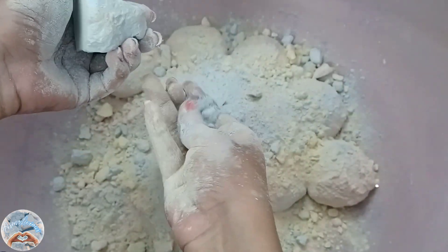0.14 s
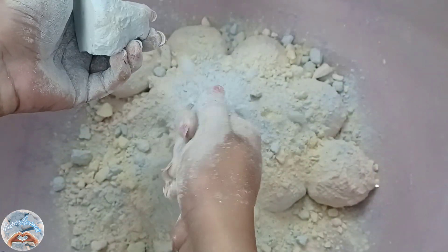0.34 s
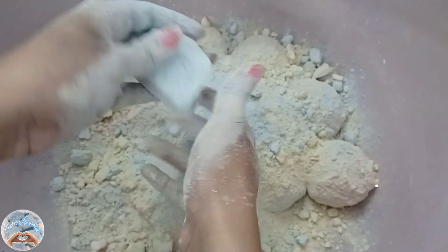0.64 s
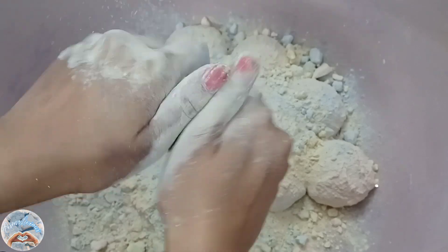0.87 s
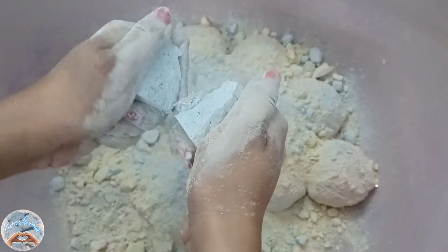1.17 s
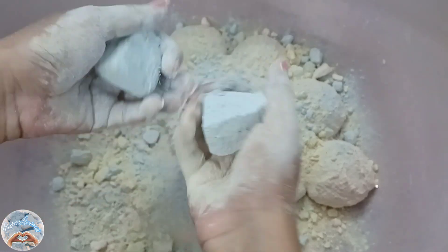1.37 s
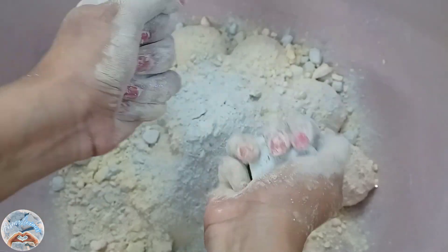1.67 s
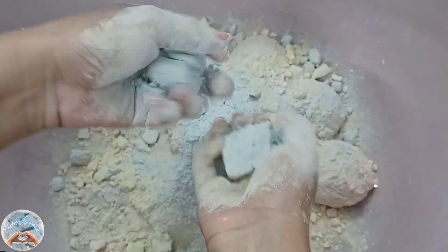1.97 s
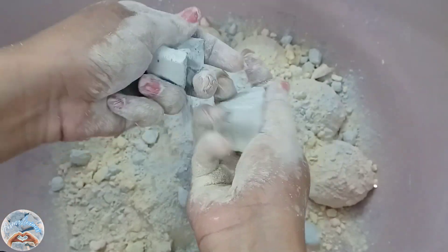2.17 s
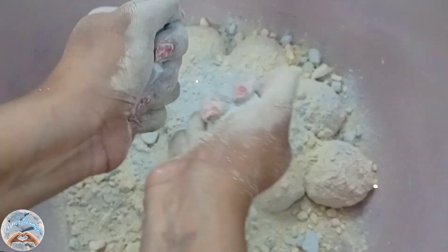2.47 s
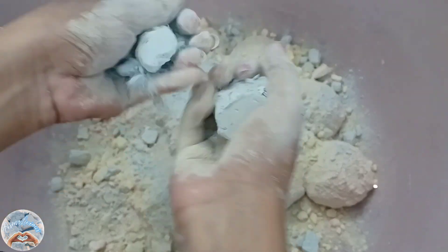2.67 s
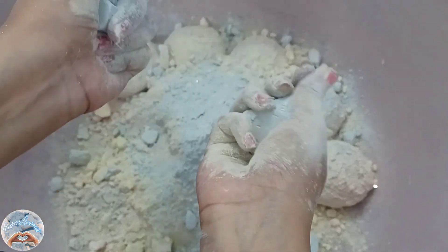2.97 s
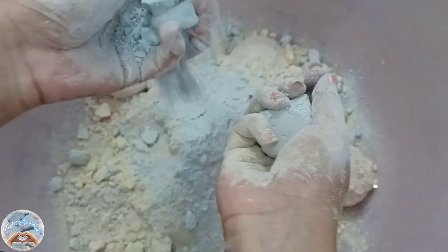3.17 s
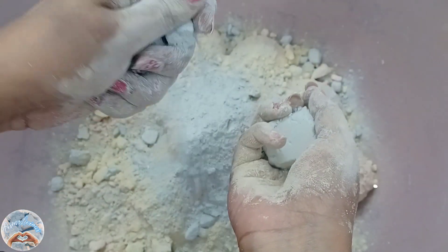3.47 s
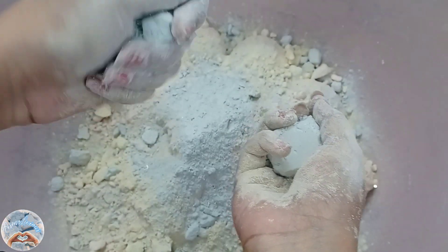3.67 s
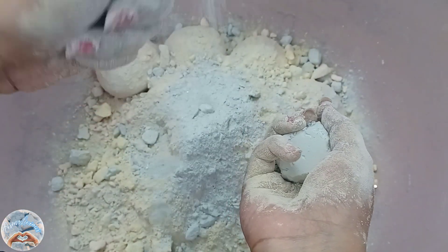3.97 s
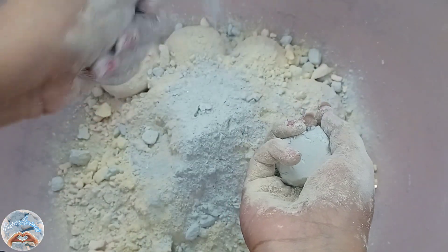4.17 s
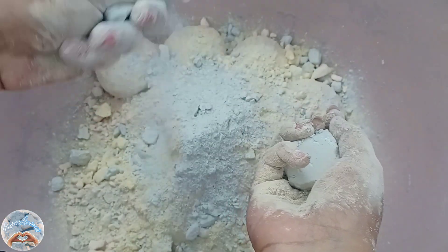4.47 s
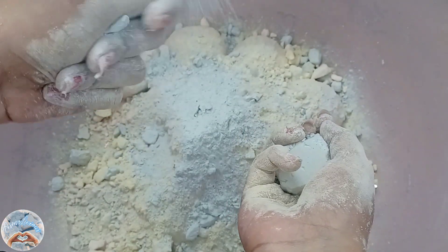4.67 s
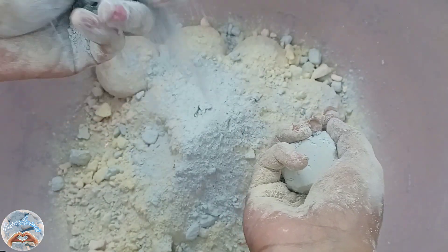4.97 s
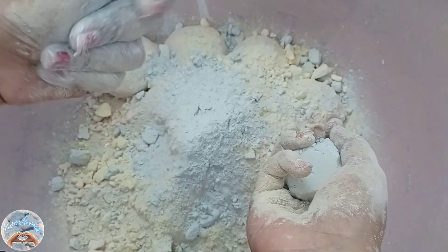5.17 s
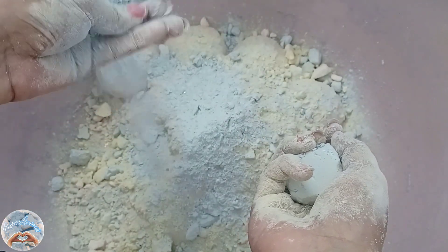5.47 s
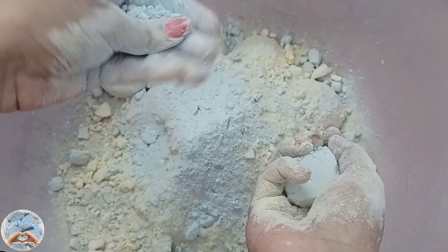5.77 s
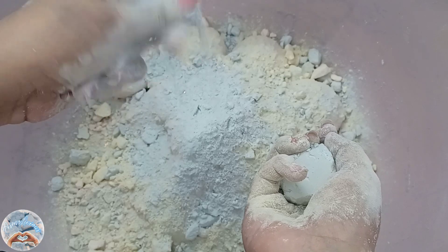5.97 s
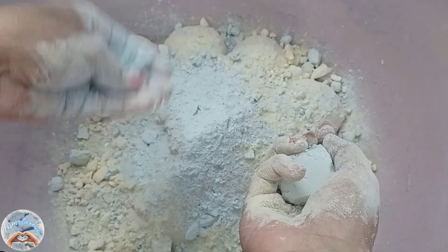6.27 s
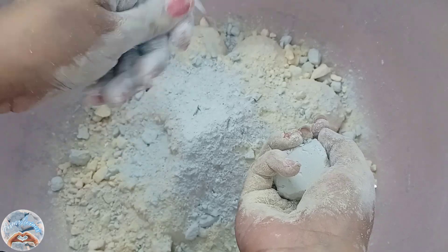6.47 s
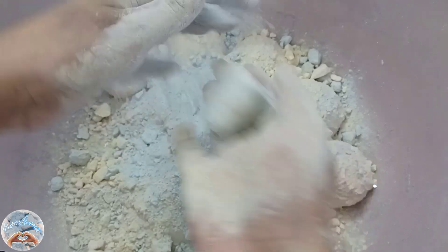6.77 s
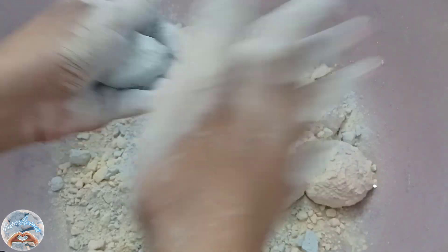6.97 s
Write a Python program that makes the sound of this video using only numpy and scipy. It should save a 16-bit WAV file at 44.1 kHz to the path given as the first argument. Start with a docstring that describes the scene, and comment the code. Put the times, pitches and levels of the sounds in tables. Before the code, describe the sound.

A low, slightly wavering fan hum and soft bassy air run throughout, in a small room close to the microphone. At once, at 0.05 s, a very bright, hard chalk crack; at 0.5 s another loud snap with a hollow plastic basin knock. Around 1.1 s lumps press together in a heavy crunch with dull thuds and a tiny high squeak. A duller break and thud land at 1.7 s. From 2.0 to 2.3 s knocks, crunches and dry clacks cluster, and at 2.55 s comes the densest burst of gritty snaps. Smaller breaks follow near 2.9 and 3.3 s. From 3.4 to 4.9 s crumbs crackle and grind muffled in a fist, with fine powder fizzing and trickling and a crisp tick at 4.2 s. It quiets around 5 s, then crunches and two sharp snaps come at 5.45-5.5 s. Soft powdery rubbing remains, with a small crunch at 6.8 s and a faint knock near 7 s.

```python
"""Lumps of dry chalk snap and crumble between two hands over a plastic basin, close to a phone microphone.
Each break is an avalanche of clicks, coloured into a clack and grit, with the basin's modes knocked along.
Swelling grains make powder rubbing and trickling, crumbs in the fist and the palm's rumble; lumps squeak
together once by stick-slip, and pieces thud onto the heap. Behind them a wavering sine and soft noise
stand for the motor and air of a fan, and the small room answers with dense reflections."""
import sys
import numpy as np
from scipy import signal
from scipy.fft import rfft, irfft
from scipy.io import wavfile
from scipy.ndimage import uniform_filter1d

SR = 44100
rng = np.random.default_rng(int(sys.argv[2]) if len(sys.argv) > 2 else 0)


def store_wav(level_fs):
    """Save 16-bit WAV to argv[1]."""
    pcm = np.round(np.clip(np.atleast_2d(level_fs), -1, 1) * 32767)
    wavfile.write(sys.argv[1], SR, pcm.T.astype(np.int16))


N = 313992
TIME = np.arange(N) / SR
SHORT = TIME[:4096]  # time axis of one blow
BLOW_S = .005  # a blow's dB is its energy spread over this many seconds

# The bright spray of chalk grit. Each row: frequency in Hz, relative spectrum level in dB.
GRIT_SPECTRUM = [(1500, -42), (3500, -16), (5500, -2), (7500, 1), (10000, -1.5), (13000, -6), (16000, -16)]


def gain_of(db):
    """Decibels to amplitude."""
    return 10 ** (np.asarray(db) / 20)


def evened(x):
    """Scales to rms 1."""
    return x / np.sqrt(np.mean(x ** 2) + 1e-20)


def blow(x, db):
    """Gives a short sound the energy of a blow of this level."""
    return gain_of(db) * x * np.sqrt(BLOW_S * SR / (np.sum(x ** 2) + 1e-20))


def read(points, hz):
    """Reads a table of values against frequency on a log-frequency axis."""
    f, value = np.transpose(points)
    return np.interp(np.log(hz + 1), np.log(f + 1), value)


def add(mix, s, sound):
    """Mixes a sound in at s seconds."""
    part = mix[max(round(s * SR), 0):][:len(sound)]
    part += sound[:len(part)]


def colour(x, points):
    """Causal minimum-phase filter with the given spectrum, so attacks stay sharp."""
    hz = abs(np.fft.fftfreq(len(SHORT), 1 / SR))
    log_gain = np.log(gain_of(read(points, hz)))
    taps = np.fft.ifft(np.exp(np.conj(signal.hilbert(log_gain)))).real
    return signal.oaconvolve(x, taps)[:len(x)]


def drift(rate_hz):
    """Slow random wandering of rms 1, smoothed above the given rate."""
    hz = np.fft.rfftfreq(N, 1 / SR)
    return evened(irfft(rfft(rng.standard_normal(N)) / (1 + (hz / rate_hz) ** 4), N))


def grains(per_s, spread_db):
    """Sparse clicks of either sign at random moments: many small, a few large."""
    size = gain_of(spread_db * np.minimum(rng.exponential(1, N), 4.5))
    return size * rng.choice([-1, 1], N) * (rng.random(N) < per_s / SR)


def swells(pushes, rest_db):
    """Each push of the hand rises and falls as a bell; their powers add over a resting level."""
    power = sum(gain_of(db) ** 2 * np.exp(-((TIME - s) / half) ** 2) for s, half, db in pushes)
    return np.sqrt(gain_of(rest_db) ** 2 + power)


def ringing(modes, detune):
    """Dying modes; each contact point detunes and weights them a little differently."""
    hz, db, t60 = np.transpose(modes)[:, :, None]
    shift, weight = rng.standard_normal((2, len(modes), 1))
    envelope = gain_of(db + 2 * weight - 60 * SHORT / t60)
    return (envelope * np.sin(2 * np.pi * hz * (1 + detune * shift) * SHORT)).sum(0)


def fracture(decay, per_s):
    """A crack runs through the chalk: a first click and a dying avalanche of random ones."""
    build_up_s = .0002  # the avalanche takes a moment to gather speed
    clicks = rng.standard_normal(len(SHORT)) * (rng.random(len(SHORT)) < per_s / SR)
    clicks *= 1 - np.exp(-SHORT / build_up_s)
    clicks[0] = 0.67
    return clicks * np.exp(-SHORT / max(decay, 1 / SR))


def unpitched(clicks):
    """Levels an avalanche's broad spectral humps, so that the lump gives the colour."""
    power = uniform_filter1d(abs(rfft(clicks)) ** 2, size=40)
    excess_db = 10 * np.log10(power / power.mean() + 0.048)
    return colour(clicks, np.column_stack([np.fft.rfftfreq(len(clicks), 1 / SR), -excess_db]))


def knock(db):
    """A soft contact rings the basin's low modes; it takes a moment to build up."""
    # The basin's low modes. Each row: frequency in Hz, relative level in dB, t60 in seconds.
    basin_modes = [(234, -10, 0.095), (309.5, -7.5, 0.055), (364.8, 1.5, 0.051), (412, -10, 0.033),
                   (483, -7.5, 0.026), (625, -14, 0.016), (687.5, -7, 0.043)]
    return blow(ringing(basin_modes, detune=0.036) * (1 - np.exp(-SHORT / 0.0012)), db)


def crack(decay, clack_db, hz, width, grit_db, knock_db, ring_share, low_db, high_db):
    """One fracture: the lump clacks around its own pitch, grit sprays, and the basin is knocked."""
    # The brighter ring of chalk and basin. Each row: frequency in Hz, relative level in dB, t60 in seconds.
    ring_modes = [(745, 5, 0.027), (830, -10.5, 0.018), (1144, 2.5, 0.032), (1520, -15, .018),
                  (1700, -16, .014), (1933, 5.5, 0.022), (2263, 1.5, 0.019), (2643, 3, 0.015),
                  (2920, -4, 0.014), (3395, -5.5, 0.044), (3950, -4.5, 0.0054), (5920, 3.5, 0.018),
                  (7440, 10, 0.0089)]
    clicks = unpitched(fracture(decay, per_s=9800))
    # soft chalk blunts every click
    clicks = signal.sosfilt(signal.butter(2, 9000, fs=SR, output="sos"), clicks)
    rung = signal.fftconvolve(clicks, ringing(ring_modes, detune=0.0094))[:len(SHORT)]
    # each skirt point: distance from hz in widths, level in dB
    skirts = [(-2.0, -36.0), (-1, low_db), (-0.56, 1.5), (0.81, -1.0), (1, high_db), (2.5, -33.5)]
    shape = [(hz * 2 ** (step * width), db) for step, db in skirts]
    clack = evened(colour(clicks, shape)) + ring_share * evened(colour(rung, shape))
    grit = colour(fracture(decay, per_s=7000), GRIT_SPECTRUM)
    return blow(clack, clack_db) + blow(grit, grit_db) + knock(knock_db)


def snaps(ring_share):
    """Big lumps break or knock on one another with a short, dry clack."""
    # Each row: start in seconds, decay in seconds, clack level in dB, clack centre in Hz,
    # clack width in octaves, grit level in dB, basin knock level in dB.
    breaks = [(0.0488, .0015, -8.5, 6150, 1, -49.5, -47), (0.0498, 0.0028, -16.5, 2410, 0.91, -53, -38),
              (0.5133, 0.0011, -10, 2200, 0.92, -30, -19.5), (.545, 0.00089, -22, 686, 0.79, -51, -25),
              (0.5504, 0.00093, -19.5, 1600, 0.79, -46, -31), (1.109, 0.013, -23, 870, 1, -24.5, -17.5),
              (1.118, .006, -23, 900, 0.91, -36, -18), (1.146, .0018, -24, 1370, 1.86, -33, -11),
              (1.679, 0.0035, -27.5, 1780, 1.3, -33, -26), (2.179, 0.0038, -24.5, 1670, 1.2, -32, -15.5),
              (2.185, 0.0012, -16.5, 2300, 1.3, -34.5, -18), (2.2491, 0.0027, -14, 2240, 1.0, -38, -28),
              (2.5456, .0013, -26, 1440, 1.1, -32, -43.5), (2.55, 0.0042, -10, 1440, 1.14, -30, -19.5),
              (2.557, 0.0013, -12.5, 1920, 1.46, -24, -19), (2.56, 0.0034, -12, 1270, 1.35, -19.5, -17.5),
              (2.594, .0028, -19, 1700, 1, -34, -23), (2.882, 0.0037, -28, 910, 0.88, -33, -20),
              (2.91, .005, -35, 1020, 0.53, -48, -28), (3.333, .0054, -33, 1230, 1.07, -38, -28),
              (3.386, 0.0028, -29.5, 2420, 1, -35, -38), (4.2107, .0008, -21.5, 3740, 1.15, -35, -38),
              (5.507, 0.00067, -17, 3150, 1.06, -34, -42), (5.5099, 0.0026, -14.5, 2600, 1.22, -37, -52)]
    out = np.zeros(N)
    for s, *row in breaks:
        add(out, s, crack(*row, ring_share=ring_share, low_db=-14, high_db=-12.5))
    return out


def crumb(decay, grit_db, knock_db):
    """One small crumb collapses; the longer its crack runs, the more it clacks against the knock."""
    typical_decay_s, clack_db_at_typical, clack_db_per_doubling = 0.0041, -10, 5
    doublings = np.log2(max(decay, 1 / SR) / typical_decay_s)
    clack_db = knock_db + clack_db_at_typical + clack_db_per_doubling * doublings
    centre_hz, width_octaves = 2290, 1.0
    return crack(decay, clack_db, centre_hz, width_octaves, grit_db, knock_db,
                 ring_share=0.55, low_db=4, high_db=3.5)


def crunches():
    """The larger crumbs collapse one by one."""
    # Each row: start in seconds, decay in seconds, grit level in dB, basin knock level in dB.
    collapses = [(.4669, 0.0025, -23.5, -21), (1.133, 0.0085, -33, -22.5), (1.982, 0.0016, -45, -28.5),
                 (2.086, 0.0043, -29, -28.5), (2.114, 0.0058, -31, -32.5), (2.42, 0.0088, -29, -34.5),
                 (2.52, 0.01, -29.5, -29), (3.303, 0.0014, -34.5, -24.5), (3.44, 0.012, -29, -37),
                 (3.523, 0.0051, -33, -42), (3.794, 0.0036, -35.5, -39), (3.8065, 0.0007, -32, -30),
                 (3.991, 0.0066, -31, -31), (4.0207, 0.0024, -32, -28), (4.19, 0.0095, -34, -23.5),
                 (4.2058, .0006, -24.5, -27.5), (4.293, 0.0033, -29, -35), (4.317, 0.00059, -24.5, -30),
                 (4.415, .006, -30, -37.5), (4.452, 0.0051, -30.5, -37), (4.521, 0.0063, -30, -29),
                 (4.629, 0.012, -25, -25.5), (4.637, 0.00094, -22, -31), (4.86, 0.0035, -34, -32.5),
                 (5.437, 0.0049, -30, -39), (5.452, .001, -30, -27), (5.47, 0.0058, -26.5, -30),
                 (5.483, 0.019, -27.5, -33), (6.812, 0.0035, -29, -35)]
    out = np.zeros(N)
    for s, *row in collapses:
        add(out, s, crumb(*row))
    return out


def grip():
    """The fist closes on the crumbs and lets go, holding them loosely between squeezes."""
    # Each row: hardest grip in seconds, half length in seconds, swell level in dB.
    squeezes = [(.34, 0.23, -55), (2.25, 0.064, -38), (2.84, .07, -51), (3.34, 0.077, -49.5),
                (4.1, 0.245, -51), (4.58, .1, -46.5), (5.12, 0.063, -55), (6.72, 0.23, -57)]
    return swells(squeezes, rest_db=-63.5)


def strays():
    """Tiny crumbs of a few shapes collapse at random, more often while the grip is firm."""
    firm_db, most_per_s, spread_db = -54.5, 30, 4.5  # crumbs start to give way around firm_db
    firmness = 1 / (1 + (gain_of(firm_db) / grip()) ** 6)
    size = gain_of(spread_db * np.clip(rng.standard_normal(N), -2, 2))
    clicks = size * (rng.random(N) < most_per_s * firmness / SR)
    out, shape = np.zeros(N), np.arange(N) % 12  # the sample of its start picks a crumb's shape
    for k in np.unique(shape):
        one_crumb = crumb(decay=0.0034, grit_db=-41, knock_db=-39.5)
        out += signal.oaconvolve(clicks * (shape == k), one_crumb)[:N]
    return out


def chips():
    """Loose chips land with a light clack, a little grit and a faint basin knock."""
    # Each row: start in seconds, clack level in dB.
    landings = [(.119, -32), (.607, -34.5), (2.324, -31.5), (2.669, -36), (2.681, -32), (3.796, -53)]
    settle_s, centre_hz, width_octaves = 0.0045, 1850, 0.79
    grit_db, knock_db = -7.5, -15  # against the clack
    out = np.zeros(N)
    for s, db in landings:
        chip = crack(settle_s, db, centre_hz, width_octaves, db + grit_db, db + knock_db,
                     ring_share=0.7, low_db=-15, high_db=-14.5)
        add(out, s, chip)
    return out


def knocks():
    """Lumps shift in the palm without breaking, each with a dull knock of the basin's modes."""
    # Each row: start in seconds, level in dB.
    shifts = [(.322, -36), (2.133, -23.5), (2.163, -25), (2.604, -23.5), (2.972, -28), (4.063, -27.5),
              (4.27, -30), (4.339, -31.5), (4.585, -28), (4.614, -24.5), (6.964, -32)]
    out = np.zeros(N)
    for s, db in shifts:
        add(out, s, knock(db))
    return out


def thuds():
    """A hand or lump lands: the heavy heap and basin floor bounce in a few low, damped modes."""
    # Each row: start in seconds, level in dB before the bass cut, centre in Hz.
    landings = [(.325, -27, 126), (1.109, -13, 110), (1.144, -11, 88.5), (1.678, -17, 103),
                (1.994, -21.5, 70), (2.115, -25, 94), (2.883, -29, 114)]
    t60_s, build_up_s = 0.18, 0.0031
    modes = [(.72, 0.6), (1, 0.93), (1.37, -0.5), (2.05, 0.53)]  # (ratio to the centre, weight)
    out, t = np.zeros(N), TIME[:SR // 2]
    envelope = gain_of(-60 * t / t60_s) * (1 - np.exp(-t / build_up_s))
    for s, db, hz in landings:
        bounce = sum(weight * np.sin(2 * np.pi * hz * ratio * t) for ratio, weight in modes)
        add(out, s, blow(bounce * envelope, db))
    # a small basin radiates no deep bass
    return signal.sosfilt(signal.butter(4, 52, "highpass", fs=SR, output="sos"), out)


def squeak(s, length, slip_hz, db):
    """Two lumps scrape as they are pressed together: fast, uneven stick-slip pulses, all treble."""
    out, t = np.zeros(N), np.arange(0, length, 1 / SR)
    turns = np.cumsum(slip_hz * (1 + 0.02 * drift(500)[:len(t)])) / SR
    slips = sum(k * np.cos(2 * np.pi * k * turns) for k in range(4, 8))  # upper harmonics only
    add(out, s, blow(slips * signal.windows.tukey(len(t), .5), db))
    return out


def powder():
    """Fine dust shears under each stroke and trickles between: stuttering fizz with coarser grains."""
    # A finger slides through powder. Each row: middle in seconds, half length in seconds, swell level in dB.
    strokes = [(.197, 0.03, -39), (.306, 0.043, -36), (.73, 0.028, -42.5), (.82, 0.028, -38),
               (1.44, .065, -43.5), (1.69, 0.045, -34.5), (1.84, .045, -44), (2.19, 0.12, -40),
               (2.62, .068, -43), (2.79, 0.056, -41), (3.033, 0.016, -42), (3.32, 0.079, -43),
               (3.54, 0.089, -44.5), (3.669, .012, -34), (3.94, 0.093, -44), (4.2, 0.035, -42),
               (4.46, .15, -42.5), (5.098, 0.051, -40), (5.53, 0.073, -42), (6.0, .06, -41.5),
               (6.65, 0.1, -42.5)]
    # The hiss of fine dust. Each row: frequency in Hz, relative spectrum level in dB.
    dust_spectrum = [(1760, -16.5), (3000, -16.5), (3590, -14.5), (4380, -7.5), (5380, -3), (8180, 0),
                     (9850, -1.5), (12400, -2.5), (14600, -4), (15500, -6.5)]
    flow = swells(strokes, rest_db=-46.5)  # the rest is the trickle
    fizz = evened(colour(grains(per_s=16000, spread_db=4.5), dust_spectrum))
    # the fingers shade the treble as they move, so the lower and upper fizz swell apart
    lower = signal.sosfiltfilt(signal.butter(2, 9000, fs=SR, output="sos"), fizz)
    upper = fizz - lower
    shaded = lower * gain_of(1.4 * drift(22)) + upper * gain_of(0.68 * drift(18))
    stuttering = shaded * gain_of(1.7 * drift(58.8))
    ticks = evened(colour(grains(per_s=120, spread_db=5), GRIT_SPECTRUM))
    return flow * (gain_of(0.2) * stuttering + gain_of(-9.5) * ticks)


def fist():
    """Crumbs grind muffled in the closed hand; the brighter ones crackle out between the fingers."""
    # Sound through the closed hand. Each row: frequency in Hz, relative spectrum level in dB.
    muffle = [(150, -10), (370, 8), (550, -1.5), (750, -3.5), (950, -7), (1200, -4.5), (1700, -18.5),
              (2600, -11), (4000, -28), (8000, -38)]
    crumbs = evened(colour(grains(per_s=170, spread_db=5.0), muffle))
    grind = evened(colour(grains(per_s=2500, spread_db=3.0), muffle))
    gaps = signal.butter(2, [1100, 3800], "bandpass", fs=SR, output="sos")
    crackle = evened(signal.sosfilt(gaps, grains(per_s=440, spread_db=4.5)))
    return grip() * (gain_of(-2.0) * crumbs + gain_of(-7.5) * grind + gain_of(-5.0) * crackle)


def palm():
    """The flesh of the squeezing hand rumbles softly, up to the point where it is fully tensed."""
    # The palm's low rumble. Each row: frequency in Hz, relative spectrum level in dB.
    flesh_spectrum = [(30, -31), (100, 1), (300, -3.5), (700, -26), (3000, -68)]
    tension = np.minimum(grip(), gain_of(-51))  # fully tensed at this grip in dB
    rumble = evened(colour(grains(per_s=300, spread_db=2), flesh_spectrum))
    return gain_of(7) * tension * rumble


def hum():
    """The fan's motor hum: one sine, wavering in level and pitch."""
    hum_hz, level_db = 200.3, -38.5
    turns = hum_hz * TIME + 0.068 * drift(15)
    return gain_of(level_db) * evened(np.sin(2 * np.pi * turns) * (1 + 0.31 * drift(18.5)))


def air():
    """The soft rumble of the fan's moving air: noise weighted to the bass."""
    # Each row: frequency in Hz, relative spectrum level in dB.
    air_spectrum = [(20, -10.5), (45, -17.5), (110, -2), (180, 1), (290, -4.5), (500, -19), (1500, -32.5),
                    (3500, -50.5), (16000, -35)]
    return gain_of(-43.5) * evened(colour(rng.standard_normal(N), air_spectrum))


def room(x):
    """Dense reflections that build up after the direct sound, each band dying at its own speed."""
    # How long the room rings. Each row: frequency in Hz, t60 in seconds.
    room_t60 = [(100, 0.52), (300, 0.22), (700, 0.27), (1800, 0.38), (4000, 0.24), (9000, 0.15),
                (16000, 0.09)]
    # The tone of the room's answer. Each row: frequency in Hz, relative level in dB.
    room_tone = [(100, -16.5), (400, 0), (1800, -3), (3000, -5), (5000, -1.5), (16000, -8)]
    t = TIME[:SR // 2]
    taps = rng.standard_normal(len(t)) * (1 - np.exp(-(t / 0.0094) ** 2))
    hz, when, z = signal.stft(taps, SR, nperseg=256)
    fade = gain_of(-60 * when / read(room_t60, hz)[:, None])
    tail = signal.istft(z * fade, SR, nperseg=256)[1]
    return signal.oaconvolve(colour(x, room_tone), tail / np.linalg.norm(tail))[:N]


def side_noise():
    """Faint steady noise, opposite in left and right, that gives a little width."""
    # Each row: frequency in Hz, relative spectrum level in dB.
    noise_spectrum = [(40, -6), (400, -4), (900, -15), (3000, -36), (5000, -8), (7000, -1), (10000, -6),
                      (15000, -1.5)]
    return gain_of(-60.5) * evened(colour(rng.standard_normal(N), noise_spectrum))


def scene():
    """Everything sits in the middle; faint noise and a near reflection differ between left and right."""
    scrape = squeak(s=1.131, length=.028, slip_hz=1870, db=-23)
    small = crunches() + strays() + chips() + knocks() + thuds() + scrape
    hits = small + snaps(ring_share=0.49)
    # a break throws a different, rougher sound at the walls than at the microphone
    walls = gain_of(-14.0) * room(small + snaps(ring_share=0))
    mid = hits + walls + powder() + fist() + palm() + air() + hum()
    # the basin's side wall returns mostly treble, about a millisecond late
    early = np.roll(np.diff(hits, prepend=0), round(0.00099 * SR))
    side = side_noise() + gain_of(-29.5) * early
    return np.array([mid + side, mid - side])


def record(dry):
    """Peaks beyond full scale overload the microphone and clip; then a steep low-pass limits the band."""
    edge_hz = 15800
    clipped = np.clip(dry, -1, 1)
    taps = signal.firwin(511, edge_hz, window=("kaiser", 9), fs=SR)
    return signal.oaconvolve(clipped, taps[None], "same")


dry = scene()
out = record(dry)
store_wav(out)
```